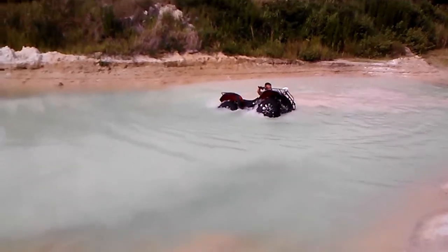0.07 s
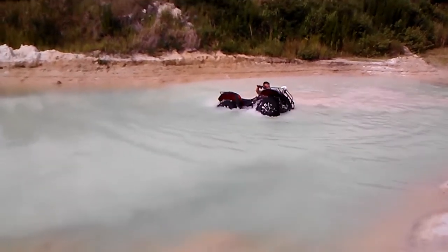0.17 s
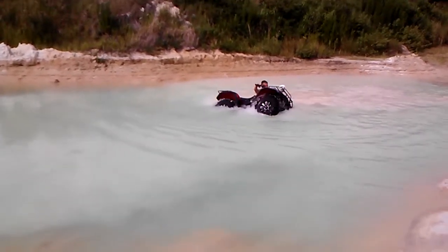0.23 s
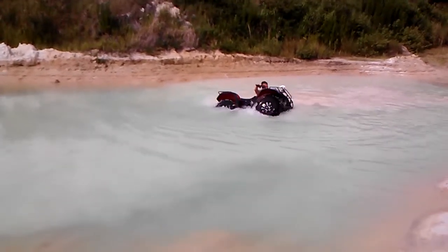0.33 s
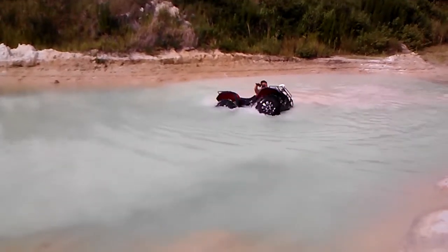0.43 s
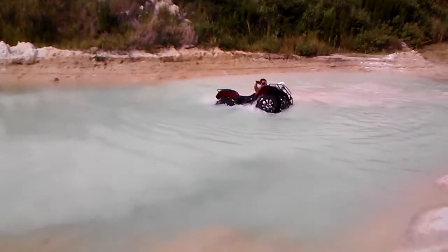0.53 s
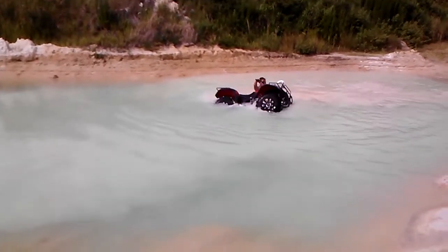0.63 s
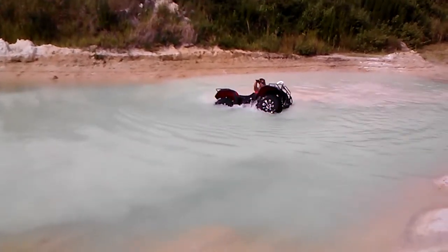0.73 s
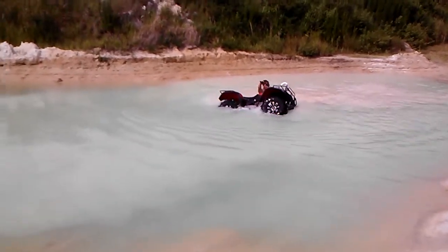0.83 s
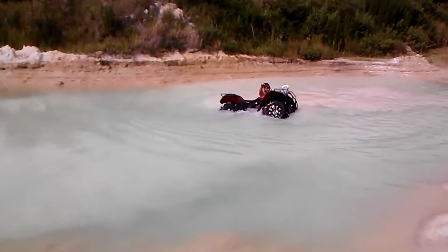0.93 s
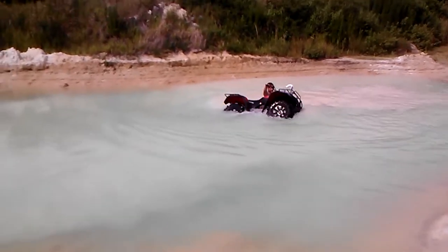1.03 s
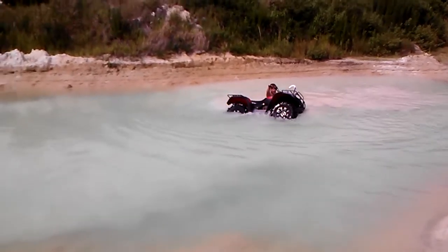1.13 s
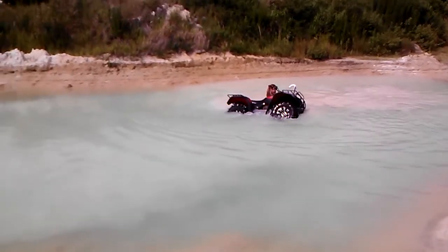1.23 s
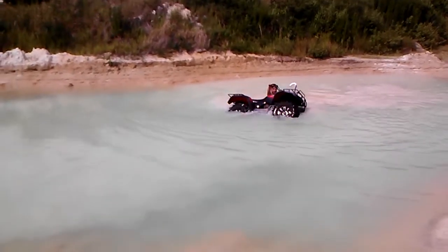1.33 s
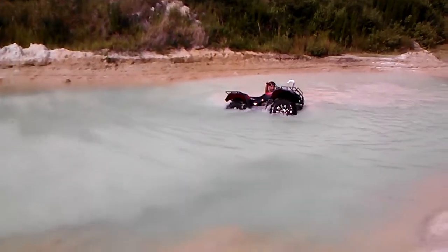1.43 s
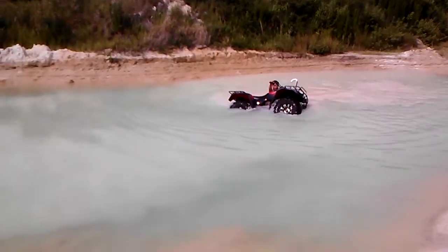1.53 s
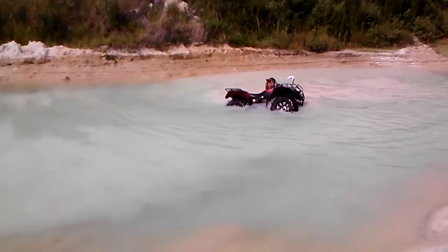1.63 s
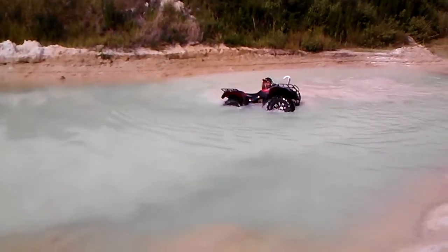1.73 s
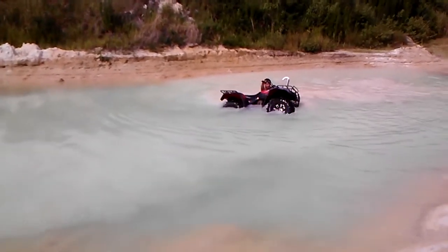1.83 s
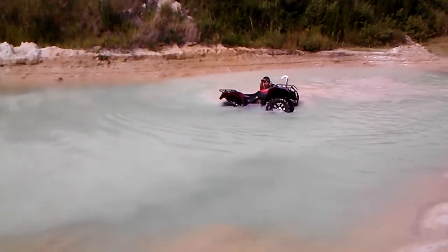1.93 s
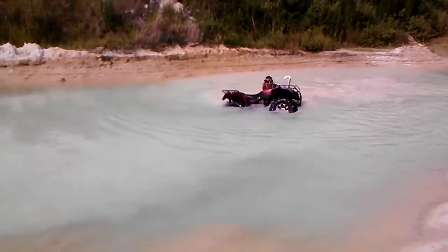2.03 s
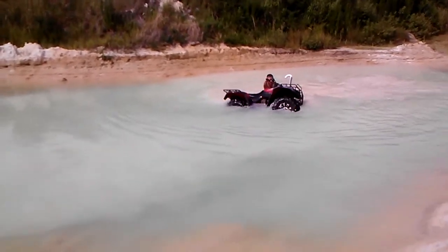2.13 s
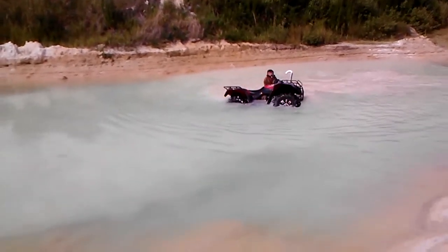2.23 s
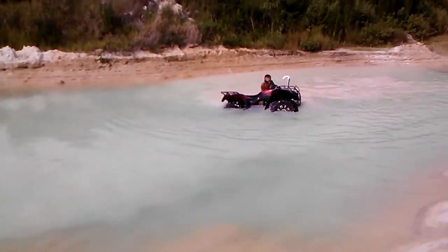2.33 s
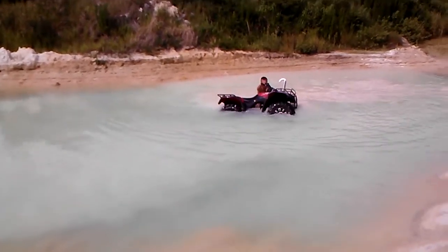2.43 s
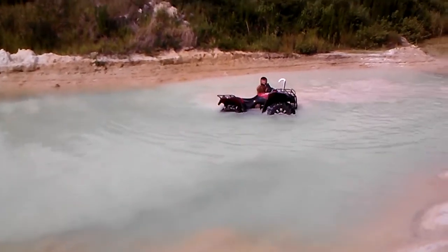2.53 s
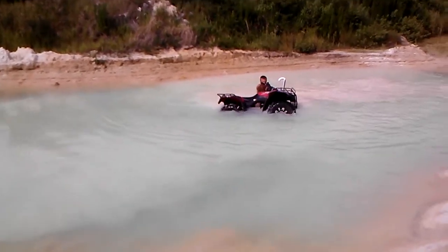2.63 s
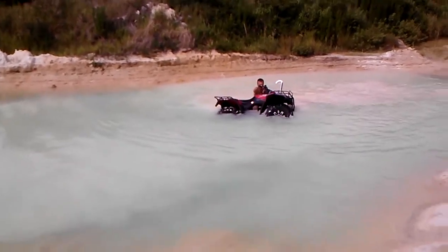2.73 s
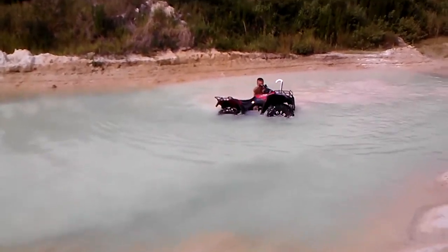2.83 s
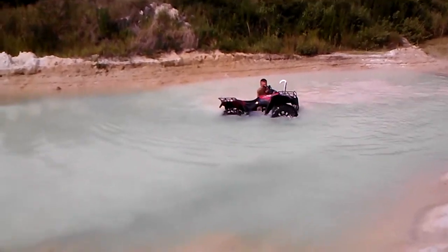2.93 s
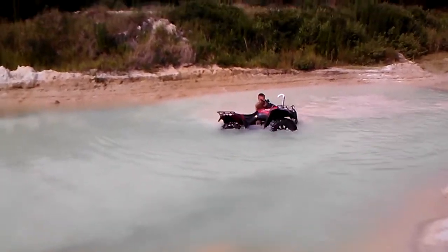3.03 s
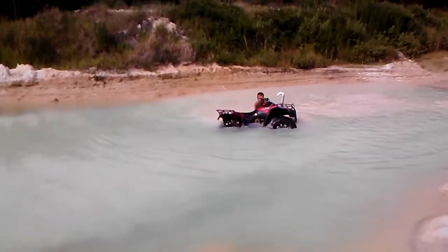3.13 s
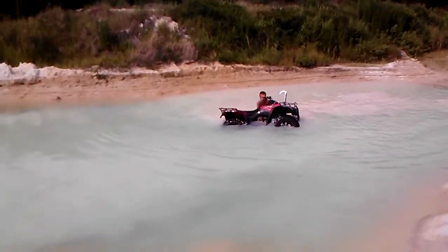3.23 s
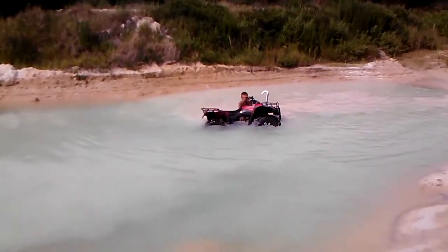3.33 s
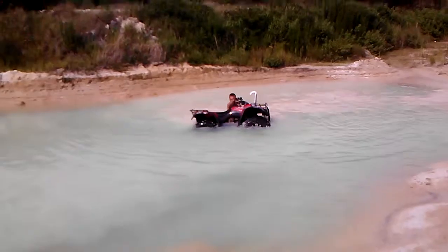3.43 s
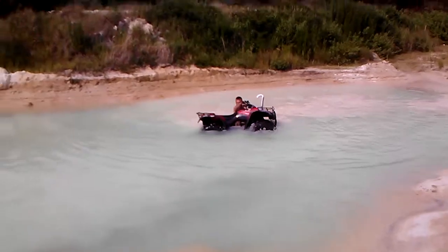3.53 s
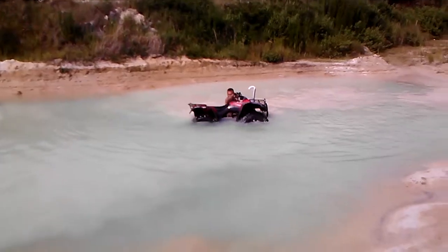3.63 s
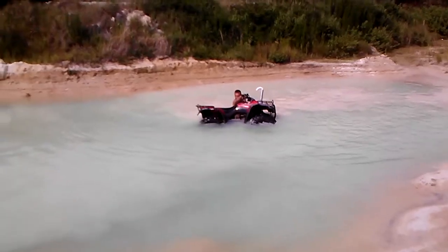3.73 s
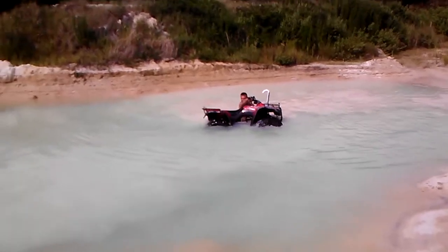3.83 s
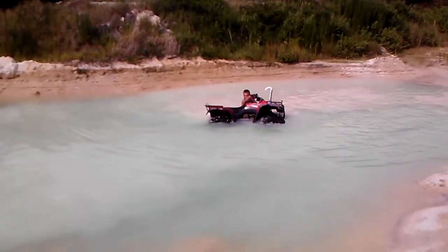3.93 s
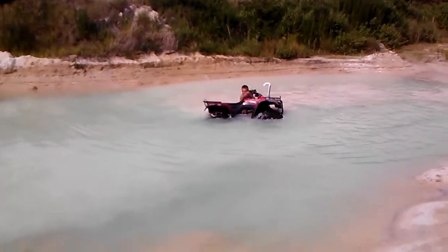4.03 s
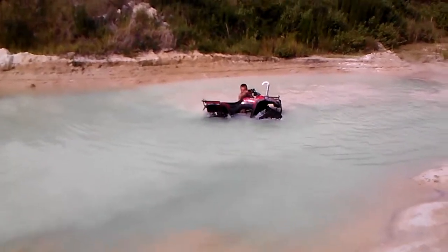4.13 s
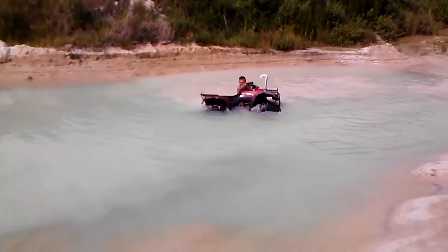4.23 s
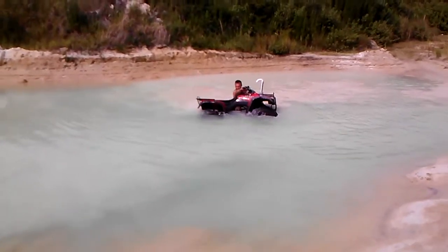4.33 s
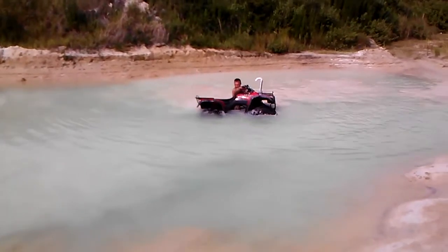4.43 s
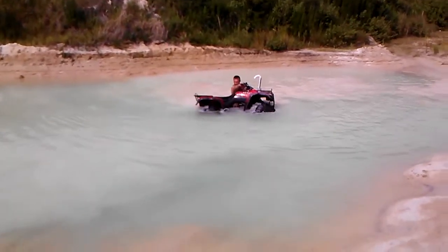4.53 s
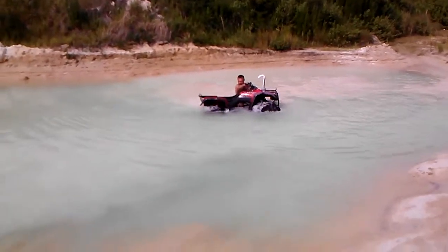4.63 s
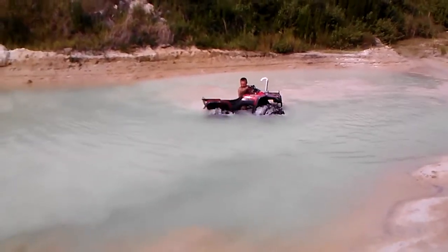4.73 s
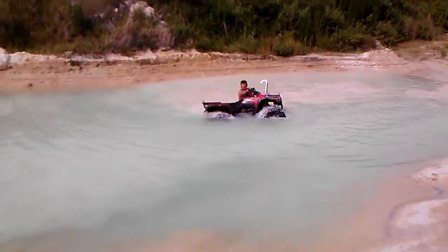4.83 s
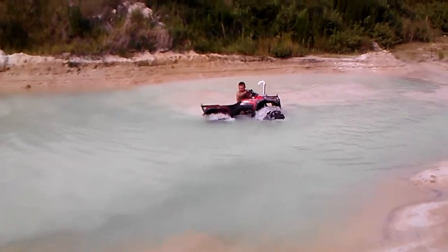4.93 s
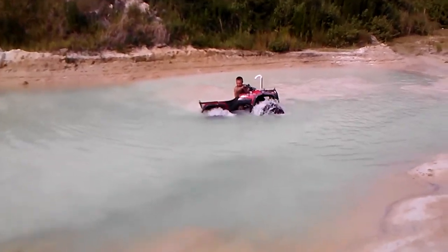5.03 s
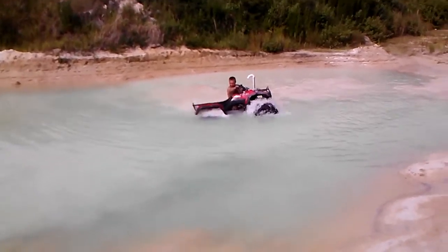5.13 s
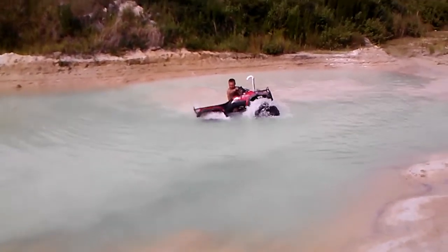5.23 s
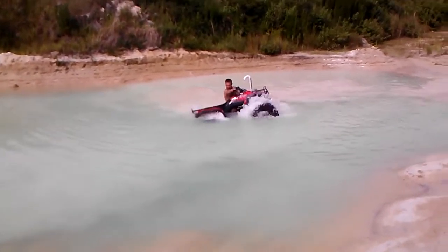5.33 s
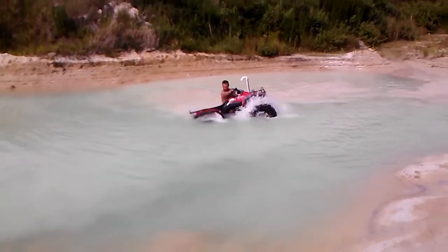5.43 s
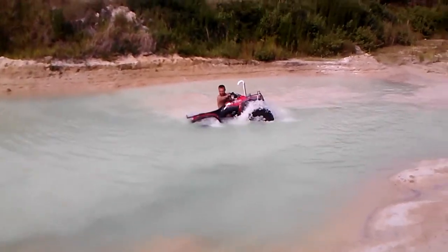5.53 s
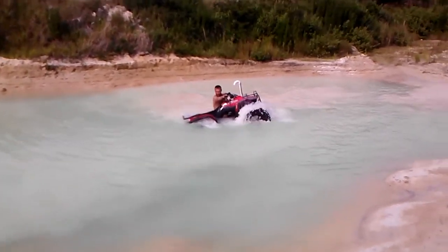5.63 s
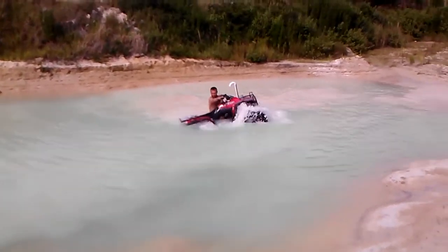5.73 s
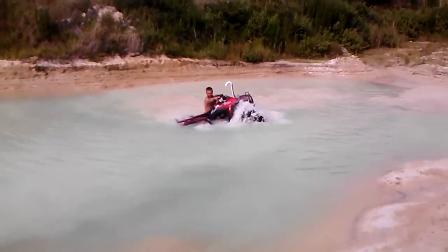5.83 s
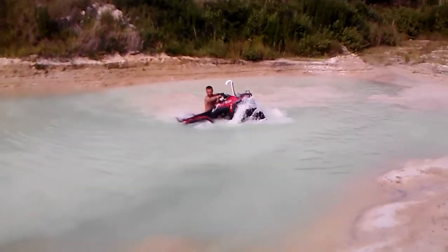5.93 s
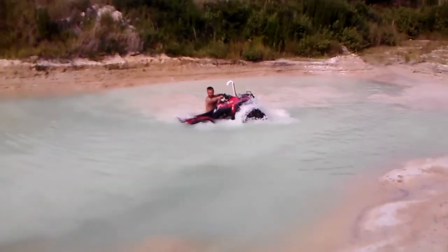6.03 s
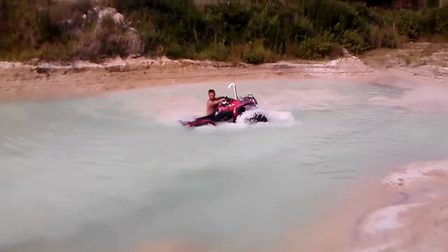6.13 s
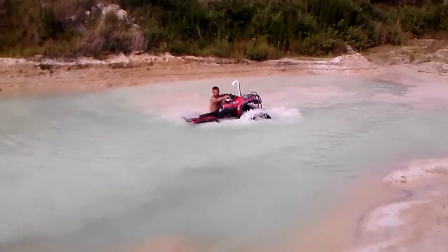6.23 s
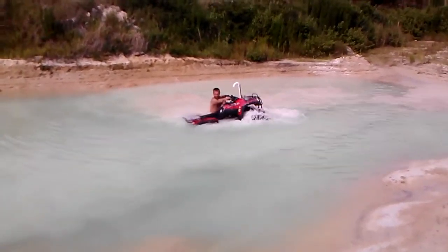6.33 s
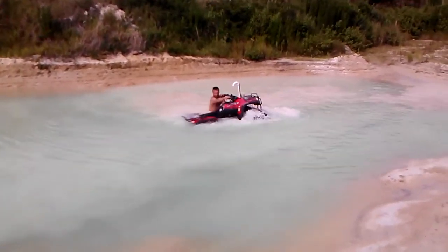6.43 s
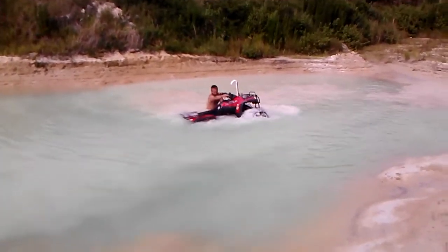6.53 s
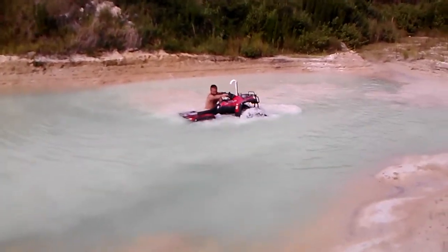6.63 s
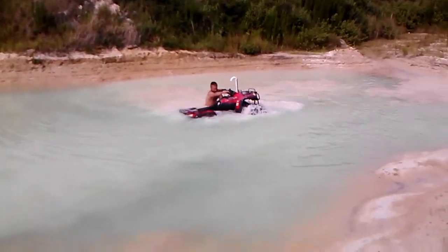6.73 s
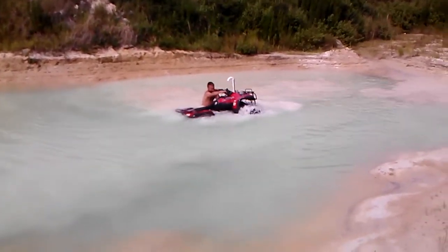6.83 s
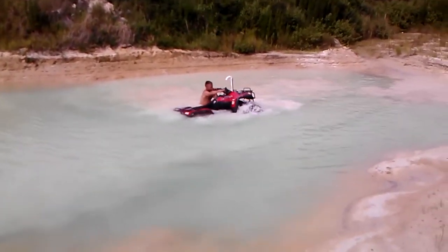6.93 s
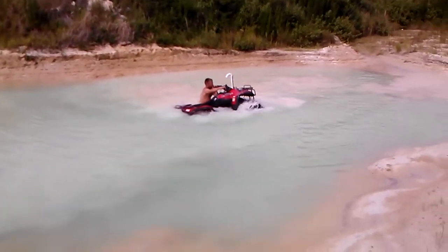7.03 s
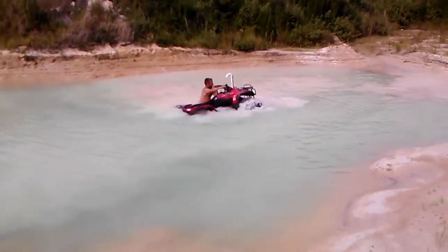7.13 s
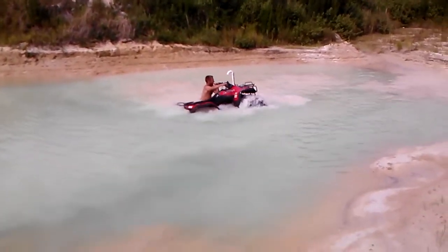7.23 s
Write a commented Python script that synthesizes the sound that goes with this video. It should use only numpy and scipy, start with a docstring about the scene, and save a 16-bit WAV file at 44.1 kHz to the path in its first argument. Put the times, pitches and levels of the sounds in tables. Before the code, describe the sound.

A quad bike's single-cylinder engine putters at idle in a pond, its flooded exhaust gulping big low bubbles. Water laps, trickles and slaps around it. After about four seconds the engine revs twice, the exhaust blowing clear, with sharp knocks, buzzing body panels, a brief high whine and spray from the wheels. It then settles to a bubbly chug. The place is outdoors, with only a faint echo.

```python
"""First comes the putter of an idling quad bike, gulping big bubbles as it wades through a pond.
Each firing of its one cylinder thumps the half-sunken exhaust pipe and rattles the engine case, while
water laps, trickles and slaps around it. Then it revs twice: the pipe blows clear, the engine knocks,
the body panels buzz, the transmission whines and the wheels throw spray.
It settles to a chug as its tail sinks."""
import sys
import numpy as np
from scipy import signal
from scipy.fft import rfft, irfft
from scipy.io import wavfile
from scipy.ndimage import uniform_filter1d

SR = 44100
rng = np.random.default_rng(int(sys.argv[2]) if len(sys.argv) > 2 else 0)


def transcribe(u):
    """Save the signal u as a 16-bit wav file named by the first command-line argument.

    u: samples, shape (n,) or (channels, n), limited to [-1, 1]; the rate is SR.
    q: integer samples, one column per channel.
    """
    v = np.clip(np.atleast_2d(u).T, -1, 1)
    q = np.round(v * 32767).astype(np.int16)
    wavfile.write(sys.argv[1], SR, q)


N = 320607
TIME = np.arange(N) / SR

# how often the engine fires, once every two turns: t/s, f/Hz
FIRING_RATE = [(0, 17.2), (1.3, 16.8), (2.1, 14.7), (2.5, 14.7), (2.65, 16), (2.8, 14.4), (3.75, 14.6),
               (4.0, 20), (4.24, 16.7), (4.42, 24), (4.6, 28), (4.85, 41.7), (4.99, 48.2), (5.15, 54.9),
               (5.27, 45), (5.36, 42.4), (5.616, 53.5), (5.72, 47.7), (5.874, 37.7), (6.02, 36.5),
               (6.12, 37.4), (6.27, 33), (6.6, 30.4), (6.87, 32.3), (7.01, 35.3), (7.27, 36.9)]
# the pipe bobs up (louder) or under (quieter): t/s, length/s, level change/dB
PIPE_BOBS = [(0.03, 0.42, 6), (0.768, 0.39, 5.5), (1.194, 0.54, -3), (2.07, 0.11, 3.5), (3.887, 0.27, 4.5),
             (4.127, 0.07, -12), (4.24, 0.43, 2.5), (4.646, 0.27, 5.5), (6.907, 0.11, 6), (7.083, .3, 8.5)]
# two bubbles a firing: lowest f/Hz, highest f/Hz, half length/swings, mean delay/s, relative level/dB
FIRING_BUBBLES = [(82, 128, 1.1, 0.0069, 8.5), (150, 270, 1.7, 0.00998, 4)]
# the pipe's steady tones: t/s, level at the engine's turning rate/dB, level an octave higher/dB
PIPE_TONES = [(4.5, -66, -70), (4.8, -30.5, -37), (5.0, -28.5, -38.5), (5.15, -26.5, -53), (5.23, -47, -55),
              (5.48, -39.5, -53), (5.62, -38, -36), (5.85, -46, -39), (6.18, -50, -35.5), (6.4, -50, -45),
              (6.76, -33.5, -53), (6.85, -55.5, -54), (6.94, -38, -38.5), (7.27, -31, -32)]
# water around the body: t/s, lapping level/dB, trickle level/dB
WASH_LEVELS = [(0, -35, -41.5), (.55, -37, -42.5), (1.06, -43, -46.5), (1.35, -37.5, -43.5),
               (2.15, -45.5, -49), (2.45, -44.5, -50.5), (3.1, -39.5, -47.5), (3.8, -43.5, -49.5),
               (3.97, -34, -47.5), (4.25, -39, -45), (6.0, -31, -48), (6.6, -39, -57), (7.27, -35, -50)]
# big exhaust bubbles: t/s, peak level/dB, f/Hz
BIG_BUBBLES = [(0.161, -13, 128), (.273, -5.5, 152), (0.2839, -10, 230), (0.3827, -3, 157),
               (0.784, -8, 157), (0.876, -19, 99), (2.108, -29, 120), (2.144, -17.5, 84.5),
               (2.165, -21, 121), (2.198, -34, 110), (2.659, -21.5, 211), (3.759, -22, 174),
               (3.989, -16, 111), (4.28, -18.5, 149), (4.43, -15.5, 126), (4.743, -12.5, 175),
               (4.887, -12, 195), (6.678, -9, 162), (7.128, -13.5, 100)]
# a hollow fills: t/s, length/s, first f/Hz, last f/Hz, loudest droplet's level/dB
HOLLOW = (1, 1, 2700, 4100, -41.5)
# slaps of water: t/s, peak level/dB, time to fade by 60 dB (t60)/s, f/Hz
WATER_SLAPS = [(2.04, -32.5, 0.051, 2400), (2.149, -36, 0.062, 2010), (2.28, -36, 0.076, 4730),
               (2.518, -33.5, 0.06, 3960), (2.6455, -38, 0.031, 5130), (2.665, -29, 0.041, 1090),
               (2.677, -25.5, 0.04, 1840), (2.7436, -17.5, 0.055, 1080), (2.752, -27.5, 0.13, 1540),
               (2.78, -34, 0.072, 4800), (2.865, -25.5, 0.074, 1430), (2.967, -37, 0.027, 3570),
               (3.012, -33, .03, 3500), (3.048, -32, .067, 5100), (3.212, -25.5, 0.022, 4600),
               (3.303, -32, 0.035, 3000), (3.384, -31, 0.03, 1550), (3.399, -35, .05, 4530),
               (3.503, -27.5, 0.088, 1400), (3.622, -33, .07, 5410), (3.742, -30, 0.059, 2480),
               (3.935, -30.5, 0.06, 3840), (4.142, -29, 0.076, 5100)]
# a short shower of drops: t/s, half length/s, level/dB
DROP_SHOWER = (3.29, 0.057, -40)
# the rider lets go of the throttle: t/s, level of the panel buzz/dB
REV_PEAKS = [(5.135, -25), (5.595, -24.5), (7.27, -39)]
# sharp engine knocks that set the body panels ringing: t/s, peak level/dB, rattle t60/s
HARD_FIRINGS = [(4.606, -15, 0.035), (4.968, -13.5, .025), (5.009, -9.5, 0.03), (5.029, -7.5, .035),
                (5.0495, -10.5, 0.018), (5.108, -7, 0.085), (5.479, -14, .03), (5.554, -16, .035),
                (5.569, -15, 0.039), (5.591, -12, .035), (6.969, -18, .021)]
# notes at which the body panels ring: f/Hz, width/Hz, level/dB
PANEL_NOTES = [(815, 40, -5), (995, 40, 0), (1205, 45, 8.5), (1360, 45, -3.5), (1630, 60, -3),
               (2120, 90, -6)]
# transmission whine near the top of each rev: t/s, half length/s, f/Hz, level/dB
GEAR_WHINES = [(5.087, 0.14, 3940, -34.5), (5.71, 0.065, 3150, -39.5)]
# tone colours (how strong each pitch is) of pipe, engine case, water and echo: f/Hz, level/dB
FLOODED_PIPE_COLOUR = [(30, -28), (45, -8), (65, -3), (110, 4), (145, -3), (220, -5), (300, -12),
                       (420, -30), (3000, -66)]
CLEAR_PIPE_COLOUR = [(30, -26), (65, -5.5), (110, -1), (150, -.5), (215, 1.5), (320, 2), (430, -5),
                     (520, -16), (900, -25.5), (3000, -59.5)]
CASE_COLOUR = [(150, -20.5), (265, -5), (360, -15), (435, -3.5), (500, -16), (580, -5), (740, -3.5),
               (890, 1), (1100, -7), (1210, -3), (1430, -8.5), (1640, -4.5), (1900, -15), (2600, -33),
               (6000, -65.5)]
SLOSH_COLOUR = [(150, -18.5), (280, 0), (370, -6), (435, -1.5), (500, -9.5), (580, -3), (730, -2.5),
                (820, 2.5), (960, -1.5), (1100, -10), (1220, -5), (1420, -9.5), (1600, -2.5), (1950, -15),
                (2320, -7), (2600, -28), (2880, -8.5), (3900, -40)]
TRICKLE_COLOUR = [(900, -27), (2000, -4), (2300, 1.5), (2600, -5.5), (2870, 1.5), (3600, -3.5), (5800, 0.5),
                  (6900, -5), (7500, -12), (8000, -22), (9000, -19), (10300, -43.5)]
SPRAY_COLOUR = [(1200, -26.5), (2100, 2), (2450, -6.5), (2800, 0), (3300, -7), (3570, -13), (3950, -3.5),
                (4950, -1.5), (5500, 2.5), (6150, -4.5), (7000, -5), (8000, -20.5), (9200, -21.5),
                (10200, -54.5)]
ECHO_COLOUR = [(60, 10), (400, -2.5), (1000, -3), (3000, -4), (9000, -15)]

# base levels at idle, and their rise for each doubling (octave) of engine speed
IDLE_HZ = 15
EXHAUST_DB, EXHAUST_DB_PER_OCTAVE = -41.5, 7
CLATTER_DB, CLATTER_DB_PER_OCTAVE = -47, 9.5
SPRAY_DB, SPRAY_DB_PER_OCTAVE = -51.5, 12
# "pull": speeding up makes the engine louder, slowing down makes it quieter
PULL_OCTAVES_PER_S, PULL_EXHAUST_DB, PULL_CLATTER_DB = 3.9, 7.5, 3.5
# between these firing rates the pipe blows clear and the beat grows more even
CLEARING_HZ, UNEVEN_FLOODED, UNEVEN_CLEAR = (28.7, 43), 0.7, 0.24
# between these firing rates the clutch takes hold and the drive adds to the clatter
CLUTCH_HZ, DRIVE_DB = (12.2, 21.7), 6
SWEPT_DB = -15.5  # at speed the wheels sweep the wash away
# between these times the tail sinks, and water muffles the engine and wheels
SINKING_S, SUNK_CLATTER_DB, SUNK_SPRAY_DB = (5.39, 7.78), -3.5, -7


def undb(db):
    """Turn decibels into a number to multiply by."""
    return 10 ** (np.asarray(db) / 20)


def unit(x):
    """Scale to an average strength (rms) of 1."""
    return x / np.sqrt(np.mean(x ** 2))


def curve(rows, column=1):
    """One column of a table, joined by straight lines in time."""
    rows = np.array(rows)
    return np.interp(TIME, rows[:, 0], rows[:, column])


def wander(hz):
    """A random wobble of size about 1 that changes course hz times a second."""
    return unit(np.interp(TIME * hz, np.arange(4096), rng.standard_normal(4096)))


def colour(x, points):
    """Filter a sound to give it a tone colour."""
    hz, db = np.transpose(points)
    size = 8192
    grid_hz = np.arange(size // 2 + 1) * SR / size
    gain = undb(np.interp(np.log(grid_hz + 1), np.log(hz), db))
    # this fold makes the filter ring after a hit, never before it
    cepstrum = irfft(np.log(gain))
    cepstrum[1:size // 2] *= 2
    cepstrum[size // 2 + 1:] = 0
    return signal.fftconvolve(x, irfft(np.exp(rfft(cepstrum))))[:len(x)]


def add(out, s, x):
    """Mix a short sound in at s seconds."""
    i = int(np.clip(s * SR, 0, N))
    out[i:i + len(x)] += x[:N - i]


def puff(t60):
    """A dying puff of noise."""
    t = TIME[:int(t60 * SR) + 2]
    return rng.standard_normal(len(t)) * undb(-60 * t / t60)


def taps(per_second, spread_db):
    """Random taps, a few much larger than the rest."""
    size = undb(spread_db * np.minimum(rng.exponential(size=N), 4))
    return unit((rng.random(N) < per_second / SR) * size * rng.choice([-1, 1], N))


def flares(pulses, t60):
    """Noise that flares at each pulse and dies away."""
    decay = np.exp(-np.log(1000) / (t60 * SR))
    return unit(signal.lfilter([1], [1, -decay], pulses) * rng.standard_normal(N))


def firings(cycle, scatter_db, jitter):
    """One pulse a firing; water at the outlet upsets their size (scatter) and timing (jitter)."""
    at = np.flatnonzero(np.diff(np.floor(cycle)))
    period = 1 / np.diff(cycle)[at]
    uneven = np.interp(np.gradient(cycle) * SR, CLEARING_HZ, [UNEVEN_FLOODED, UNEVEN_CLEAR])
    chance = np.clip(rng.standard_normal((len(at), 2)), -2, 2) * uneven[at, None]
    when = np.clip(at + (jitter * period * chance[:, 0]).astype(int), 0, N - 1)
    pulses = np.zeros(N)
    pulses[when] = undb(scatter_db * chance[:, 1]) * np.sqrt(period)
    return pulses


def exhaust(cycle, opening, octaves, pull, sunk):
    """Each firing thumps the pipe: dull and bubbly under water, brighter when blown clear."""
    pulses = firings(cycle, scatter_db=4.5, jitter=0.02)
    rush_db = -6 * opening * (1 + pull)
    gas = unit(unit(pulses) + undb(rush_db) * flares(pulses, t60=0.22))
    thump = undb(-6 * (1 - opening)) * unit(colour(gas, FLOODED_PIPE_COLOUR))
    flooded = thump + (1 - opening) * burble(cycle)
    clear = unit(colour(gas, CLEAR_PIPE_COLOUR))
    above_water = opening * (1 - sunk ** 2)
    beat = (1 - above_water) * flooded + above_water * clear
    return beat * undb(EXHAUST_DB + EXHAUST_DB_PER_OCTAVE * octaves + PULL_EXHAUST_DB * pull + bobbing())


def bobbing(ramp_s=0.05):
    """How many dB the exhaust gains or loses as its outlet rises and dips."""
    return sum(db * np.clip(np.minimum(TIME - s, s + length - TIME) / ramp_s + 0.5, 0, 1)
               for s, length, db in PIPE_BOBS)


def gas_pocket(hz, swings, skew):
    """A pocket of gas swells and collapses, loudest in the middle; skew makes it lopsided."""
    half_s = swings / hz
    reach = int(3 * half_s * SR)
    t = np.arange(-reach, reach) / SR
    swell = np.exp(-(t / half_s) ** 2)
    phase = 2 * np.pi * hz * t
    return swell * (np.cos(phase) + skew * swell * np.cos(2 * phase)) / (1 + skew)


def burble(cycle, scatter_db=5):
    """Each firing blows a large and a small bubble out of the flooded pipe."""
    out = np.zeros(N)
    fired = TIME[np.flatnonzero(np.diff(np.floor(cycle)))]
    for low_hz, high_hz, swings, delay_s, db in FIRING_BUBBLES:
        for s, (pitch, softness, late) in zip(fired, rng.random((len(fired), 3))):
            blub = gas_pocket(low_hz + pitch * (high_hz - low_hz), swings, skew=0)
            peak_s = s + delay_s * (0.5 + late)
            add(out, peak_s - len(blub) / (2 * SR), undb(db - scatter_db * softness) * blub)
    return out


def clatter(cycle, load):
    """Firings and valves rattle the engine case over the rush of the wheels; load hardens the blows."""
    blows = firings(cycle, scatter_db=4, jitter=0.02)
    valves = flares(firings(cycle + 1 / 2, scatter_db=5.5, jitter=0.018), t60=0.055)
    hard = undb(-8) * load * unit(blows)
    rattle = undb(-2.5) * flares(blows, t60=0.19)
    wheels = undb(3) * taps(4000, spread_db=2.5)
    return unit(colour(hard + rattle + undb(-2) * valves + wheels, CASE_COLOUR))


def droplet(hz, swings, glide):
    """One small bubble; its pitch rises as it rings out."""
    age = np.arange(int(swings * SR / hz)) * hz / (swings * SR)  # 0 to 1
    return undb(-60 * age) * np.sin(2 * np.pi * swings * age * (1 + glide * age))


def bubbles(count, low_hz, high_hz, swings, glide):
    """Small bubbles ring at random moments."""
    out = np.zeros(N)
    for when, pitch, softness in rng.random((count, 3)):
        hz = low_hz * (high_hz / low_hz) ** pitch
        add(out, when * N / SR, undb(-18 * softness) * droplet(hz, swings, glide))
    return unit(out)


def slosh():
    """Lapping water: a patchy wash with many small ringing bubbles."""
    wash = (taps(3500, spread_db=3) + rng.standard_normal(N)) * undb(1.6 * wander(24))
    ringing = undb(-8) * bubbles(count=2200, low_hz=600, high_hz=2800, swings=24, glide=0.07)
    return unit(colour(unit(wash) + ringing, SLOSH_COLOUR))


def trickle():
    """Patches of ringing droplets run off the body."""
    droplets = undb(-3.5) * bubbles(count=3000, low_hz=1900, high_hz=7000, swings=32, glide=0.05)
    patches = undb(1.5 * wander(30))
    patter = taps(1500, spread_db=4) + droplets + rng.standard_normal(N)
    return unit(colour(patter * patches, TRICKLE_COLOUR))


def spray(octaves, sunk, flight_s=0.024):
    """Wheels throw drops, in patches when slow and in a sheet when fast; they land a moment later."""
    patchy_db = np.interp(octaves, [0.4, 1.2], [2.2, 0.8])
    sheet = taps(7000, spread_db=2.5) * undb(patchy_db * wander(35))
    thrown_db = SPRAY_DB + SPRAY_DB_PER_OCTAVE * octaves + SUNK_SPRAY_DB * sunk
    return unit(colour(sheet, SPRAY_COLOUR)) * undb(np.interp(TIME - flight_s, TIME, thrown_db))


def gulps():
    """Exhaust gas comes up in big pockets."""
    out = np.zeros(N)
    for s, db, hz in BIG_BUBBLES:
        gulp = gas_pocket(hz, swings=0.62, skew=0.18)
        add(out, s - len(gulp) / (2 * SR), undb(db) * gulp)
    return out


def filling(count=200):
    """A thin run of droplets climbs in pitch as water fills a hollow."""
    out = np.zeros(N)
    s, length, from_hz, to_hz, db = HOLLOW
    for part, pitch, softness in rng.random((count, 3)):
        hz = (from_hz + part * (to_hz - from_hz)) * (0.92 + 0.16 * pitch)
        add(out, s + part * length, undb(db - 10 * softness) * droplet(hz, swings=40, glide=0.02))
    return out


def slaps(rise_s=0.0011):
    """Slaps of water crack brightly and ring the air that they trap."""
    out = np.zeros(N)
    for s, db, t60, hz in WATER_SLAPS:
        splash = puff(t60)
        splash *= 1 - np.exp(-TIME[:len(splash)] / rise_s)
        air = signal.iirpeak(hz, Q=1.8, fs=SR)
        ring = unit(signal.lfilter(*air, signal.lfilter(*air, splash)))
        crack = undb(-10.5) * unit(colour(splash, TRICKLE_COLOUR))
        slap = signal.sosfilt(signal.butter(3, 7300, fs=SR, output="sos"), ring + crack)
        add(out, s, undb(db) * slap / np.abs(slap).max())
    return out


def shower():
    """Water flung up by a wheel patters back onto the pond."""
    s, half_s, db = DROP_SHOWER
    patter = unit(colour(taps(1200, spread_db=2.5), TRICKLE_COLOUR))
    return patter * undb(db) * np.exp(-((TIME - s) / half_s) ** 2)


def panels(x):
    """The body panels ring; they give off little sound outside the middle pitches."""
    middle = signal.sosfilt(signal.butter(3, [720, 1750], "band", fs=SR, output="sos"), x)
    return sum(undb(db) * signal.lfilter(*signal.iirpeak(hz, hz / width, SR), middle)
               for hz, width, db in PANEL_NOTES)


def engine_knocks(rattle_db=-9):
    """Extra hard firings knock sharply and set the body panels ringing."""
    out = np.zeros(N)
    for s, db, t60 in HARD_FIRINGS:
        rattle = puff(t60)
        blow = signal.unit_impulse(len(rattle)) + undb(rattle_db) * rattle / np.linalg.norm(rattle)
        ring = panels(np.pad(blow, (0, SR // 20)))
        add(out, s, undb(db) * ring / np.abs(ring).max())
    return out


def drone(cycle):
    """Under way, the pipe hums at the engine's turning rate and an octave above it."""
    crank = 2 * np.pi * 2 * cycle + 0.2 * wander(30)  # two turns a firing
    low = undb(curve(PIPE_TONES)) * np.sin(crank)
    high = undb(curve(PIPE_TONES, column=2)) * np.sin(2 * crank)
    return np.sqrt(2) * (low + high) * undb(2.2 * wander(22))


def rasp(cycle, rise_db_per_s=57, fall_db_per_s=264):
    """Firings buzz the panels, building with each burst of throttle and fading as the rider lets go."""
    pulses = firings(cycle, scatter_db=3, jitter=0.017) * undb(3.5 * wander(70))
    buzz = unit(panels(unit(pulses) + undb(4) * flares(pulses, t60=0.06)))
    swells_db = [db - np.maximum((s - TIME) * rise_db_per_s, (TIME - s) * fall_db_per_s)
                 for s, db in REV_PEAKS]
    return buzz * undb(np.max(swells_db, axis=0))


def whine(rise_hz_per_s=490):
    """The hard-working transmission sings a rough, rising tone that swells and fades."""
    out = np.zeros(N)
    for s, half_s, hz, db in GEAR_WHINES:
        t = np.clip(TIME - s, -4 * half_s, 4 * half_s)
        phase = 2 * np.pi * np.cumsum(hz + rise_hz_per_s * t + 90 * wander(500)) / SR
        tone = unit(np.sin(phase) * undb(2.7 * wander(140)))
        out += tone * undb(db) * np.exp(-(t / half_s) ** 2)
    return out


def bank_echo(x, t60=0.62, echo_db=-20):
    """The bank scatters a faint, dull echo back over the water."""
    echo = colour(puff(t60), ECHO_COLOUR)
    return x + undb(echo_db) * signal.fftconvolve(x, echo / np.linalg.norm(echo))[:N]


def scene():
    """Engine speed and its rise set how loud and open the pipe sounds and how hard the wheels churn."""
    hz = curve(FIRING_RATE)
    cycle = np.cumsum(hz) / SR  # counts the firings
    octaves = np.log2(hz / IDLE_HZ)
    speeding_up = uniform_filter1d(np.gradient(octaves) * SR, size=SR // 10)
    pull = np.tanh(speeding_up / PULL_OCTAVES_PER_S)
    load = np.clip((hz - 30) / 16, 0, 1) * np.clip(0.5 + pull, 0, 1)
    opening = np.clip((hz - 18) / 28, 0, 1)  # 0 is a flooded pipe, 1 a clear one
    driving = np.interp(hz, CLUTCH_HZ, [0, 1])
    sunk = np.interp(TIME, SINKING_S, [0, 1])
    clatter_db = CLATTER_DB + CLATTER_DB_PER_OCTAVE * octaves + DRIVE_DB * driving
    clatter_db += PULL_CLATTER_DB * pull + SUNK_CLATTER_DB * sunk
    pipe = exhaust(cycle, opening, octaves, pull, sunk) + drone(cycle)
    engine = pipe + clatter(cycle, load) * undb(clatter_db) + rasp(cycle) + whine()
    wash = slosh() * undb(curve(WASH_LEVELS)) + trickle() * undb(curve(WASH_LEVELS, column=2))
    wash *= undb(SWEPT_DB * opening)
    water = wash + gulps() + filling() + shower() + driving * spray(octaves, sunk)
    return bank_echo(engine + water + engine_knocks() + slaps())[None]


def record(dry, low_hz=42, top_hz=9800):
    """A small microphone misses the deepest bass and the highest treble."""
    thin = signal.sosfilt(signal.butter(4, low_hz, "high", fs=SR, output="sos"), dry)
    return signal.sosfilt(signal.ellip(8, 0.2, 70, top_hz, fs=SR, output="sos"), thin)


dry = scene()
out = record(dry)
transcribe(out)
```